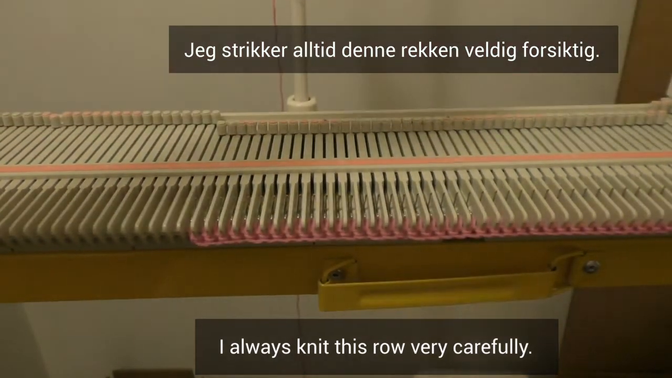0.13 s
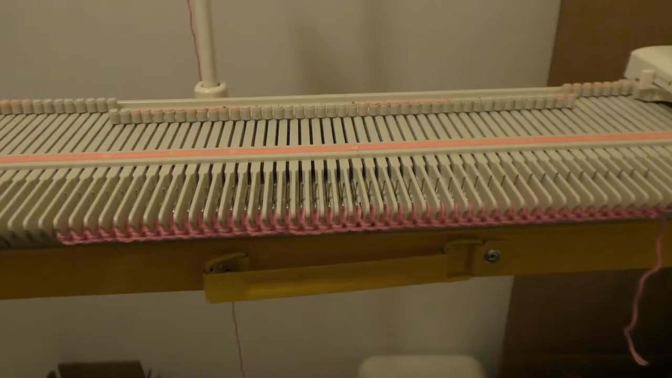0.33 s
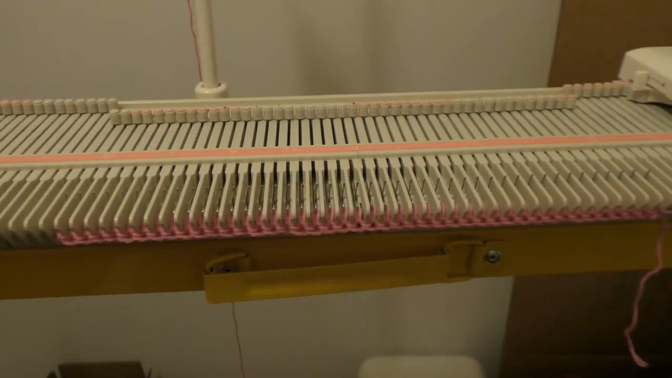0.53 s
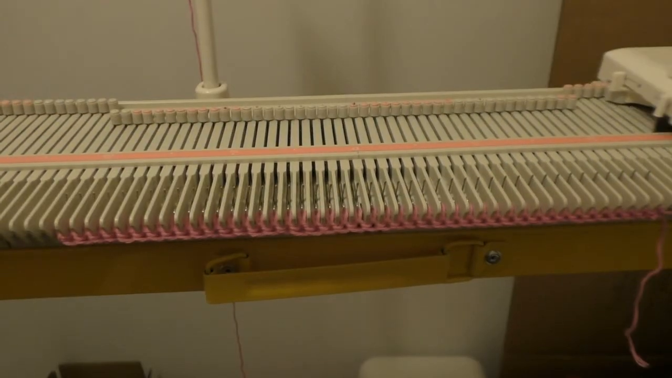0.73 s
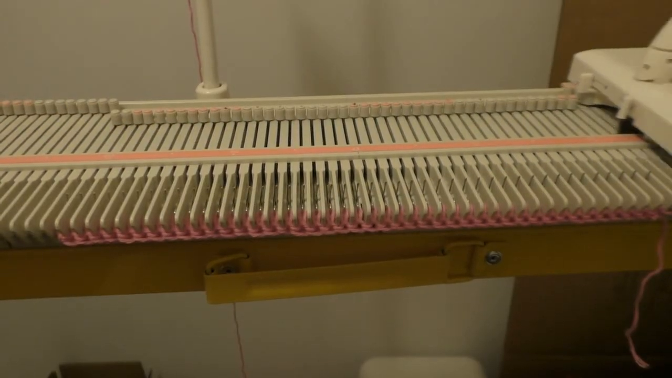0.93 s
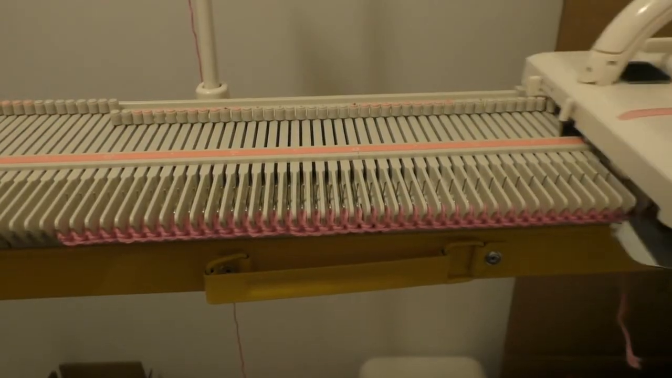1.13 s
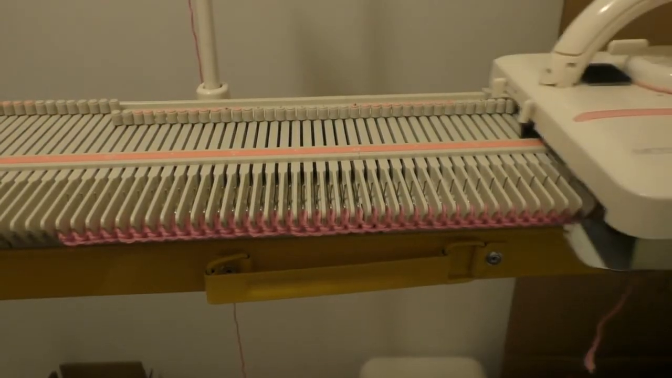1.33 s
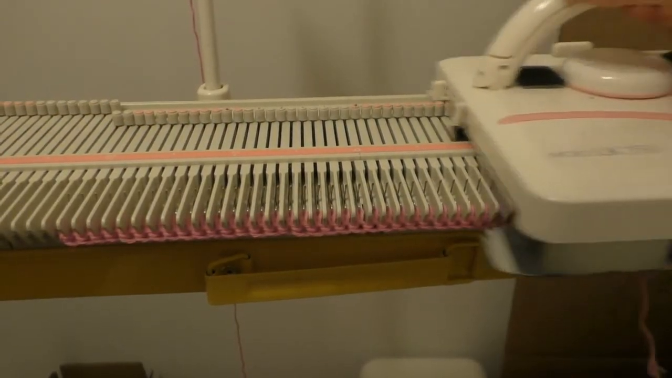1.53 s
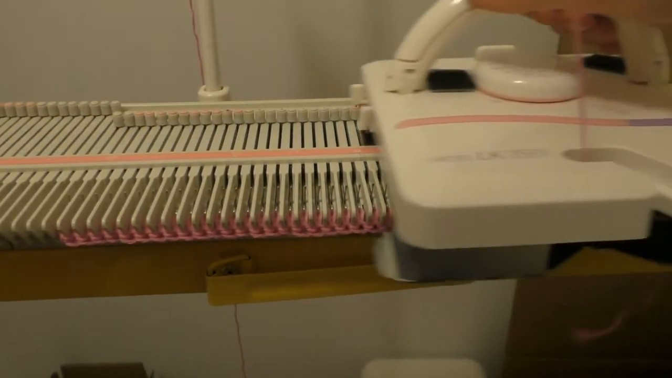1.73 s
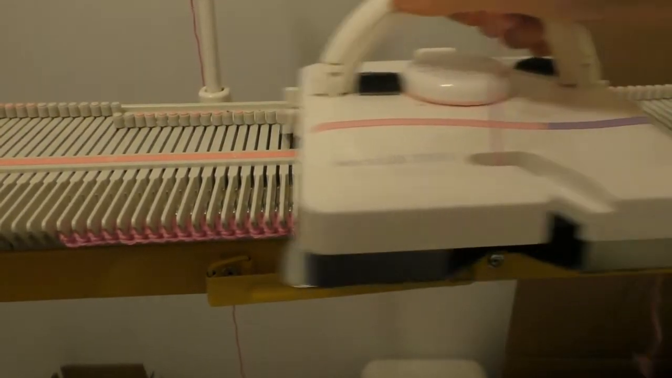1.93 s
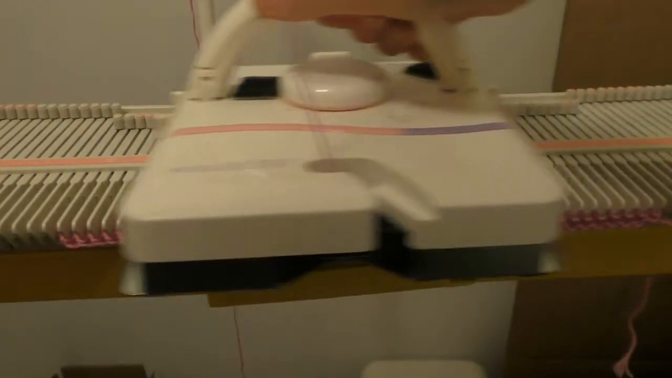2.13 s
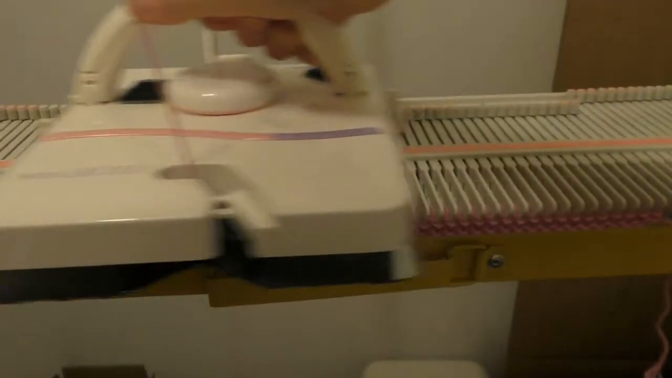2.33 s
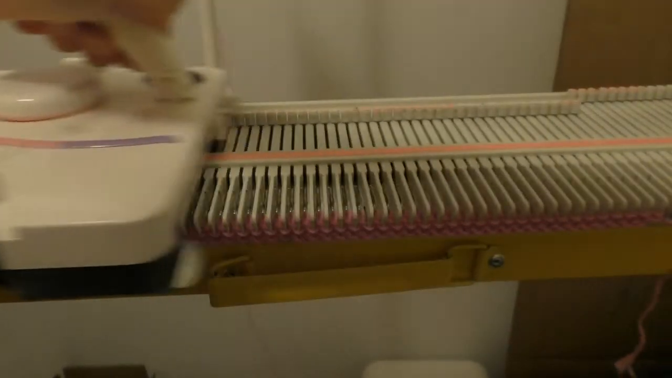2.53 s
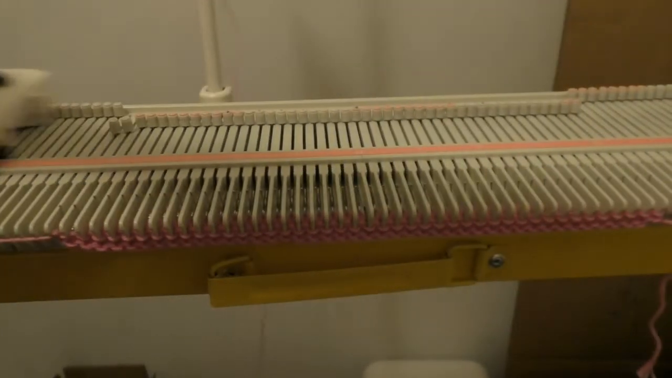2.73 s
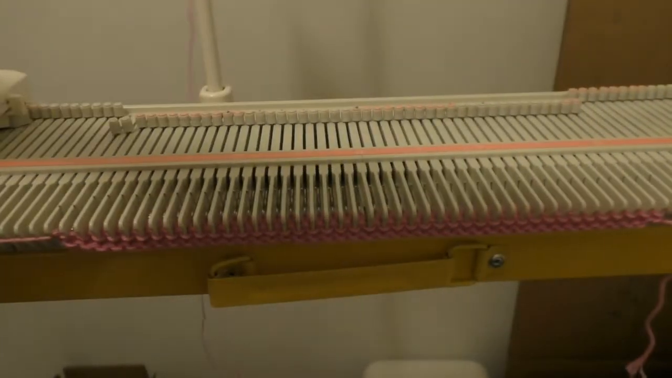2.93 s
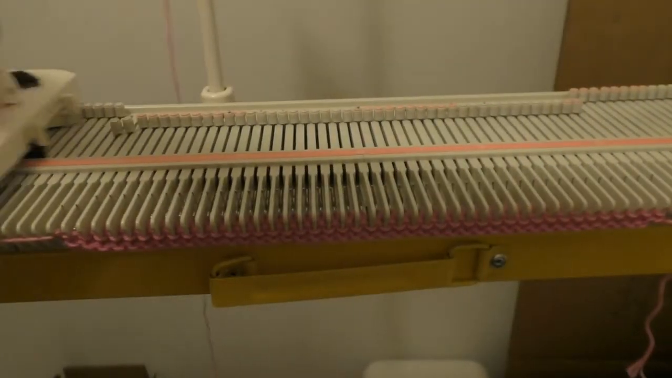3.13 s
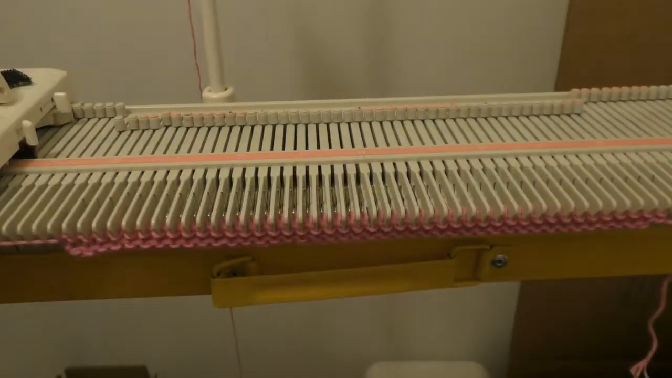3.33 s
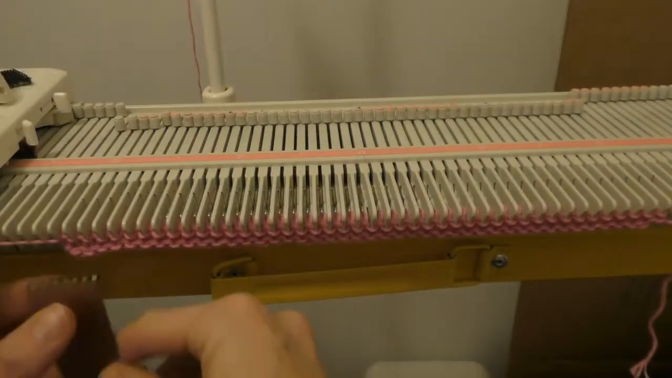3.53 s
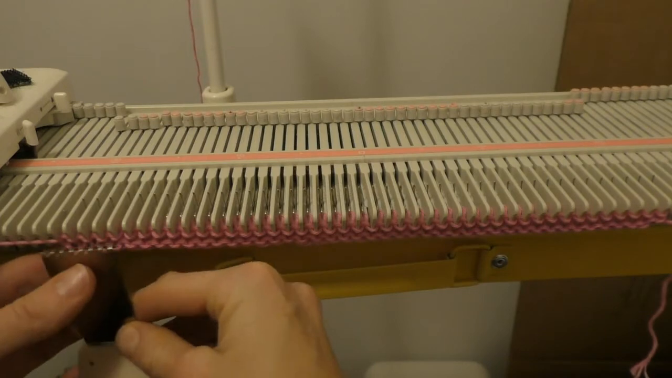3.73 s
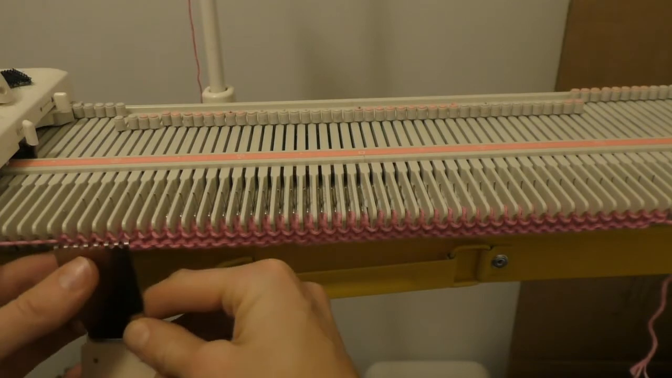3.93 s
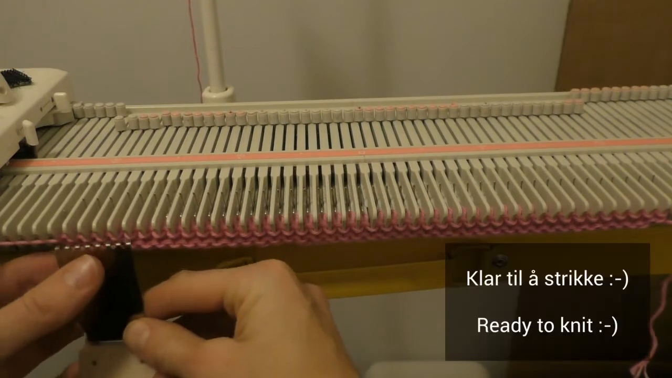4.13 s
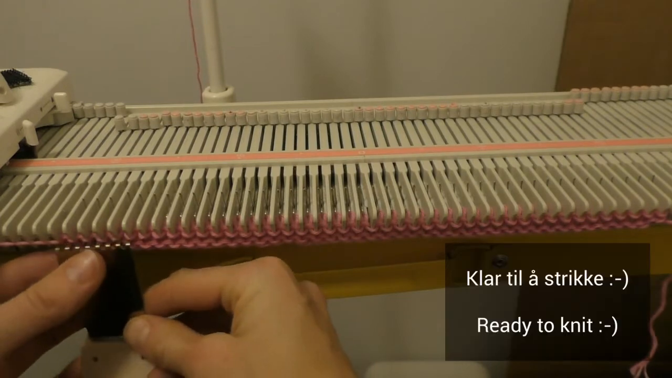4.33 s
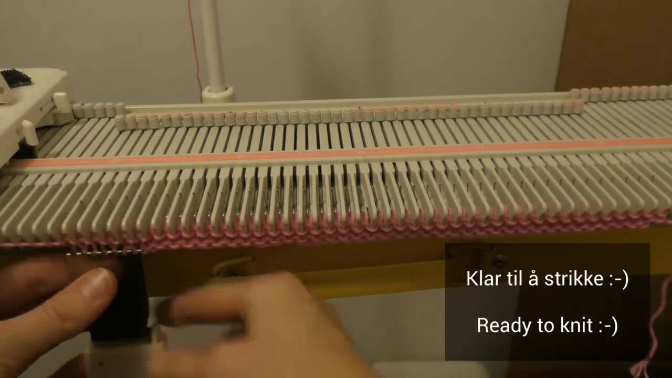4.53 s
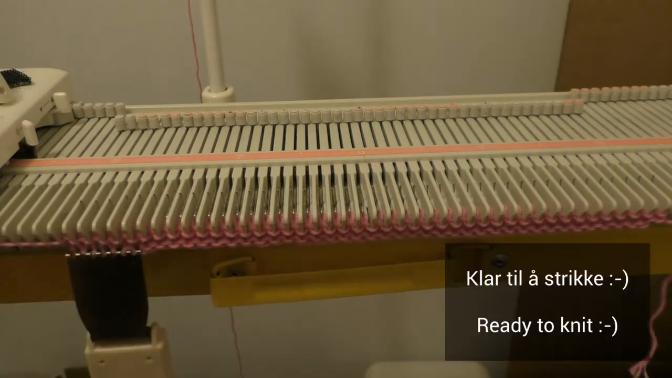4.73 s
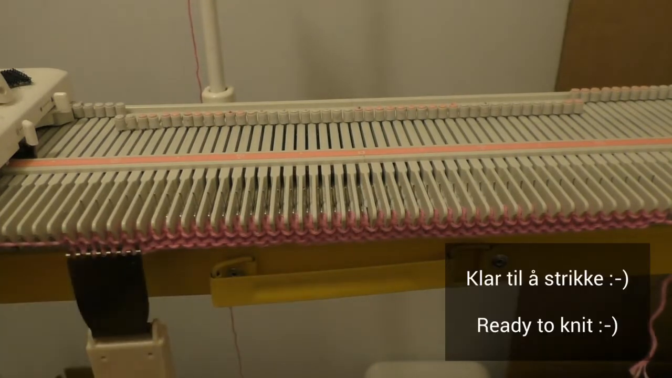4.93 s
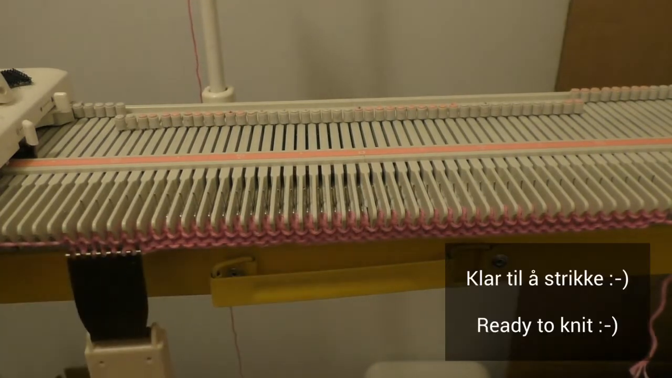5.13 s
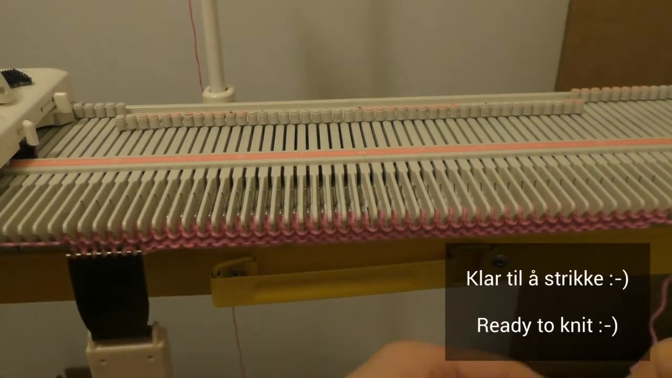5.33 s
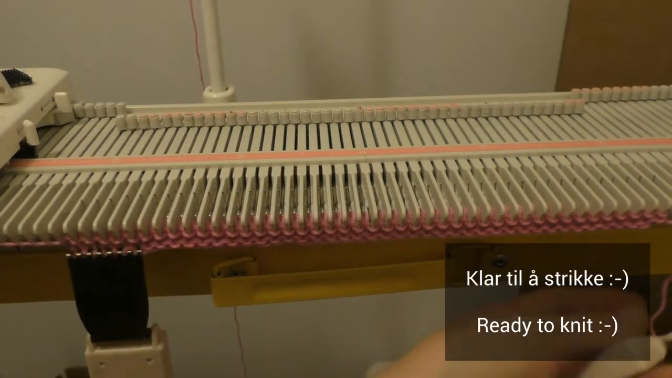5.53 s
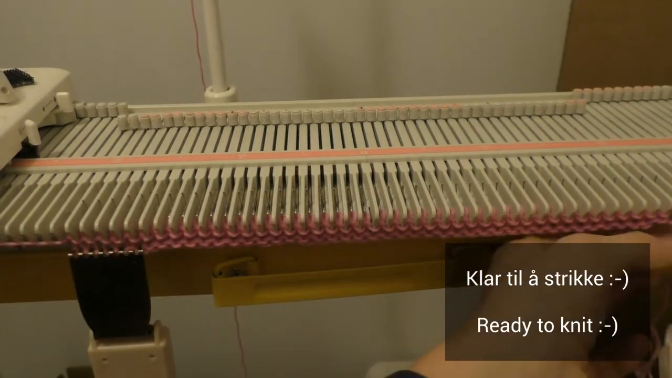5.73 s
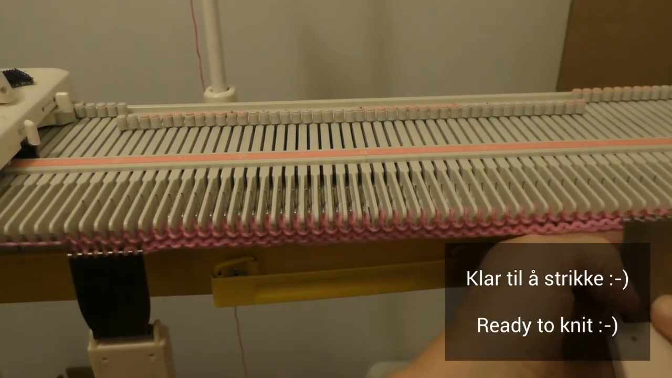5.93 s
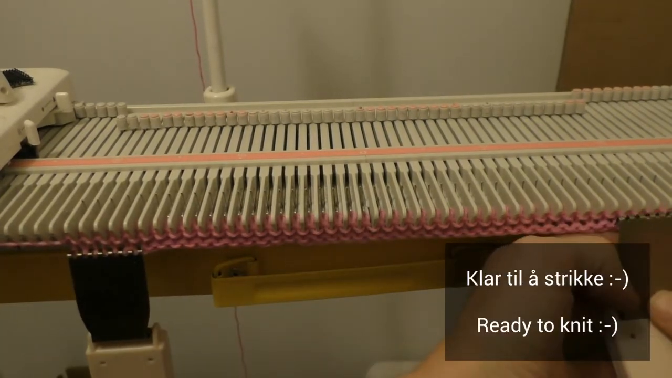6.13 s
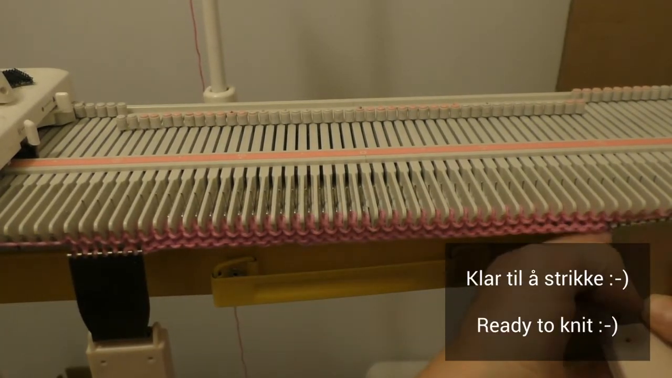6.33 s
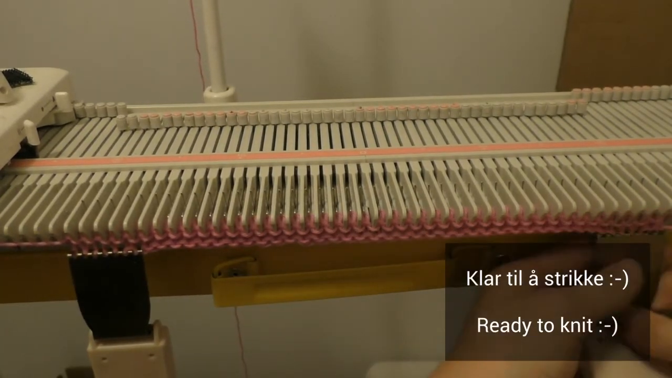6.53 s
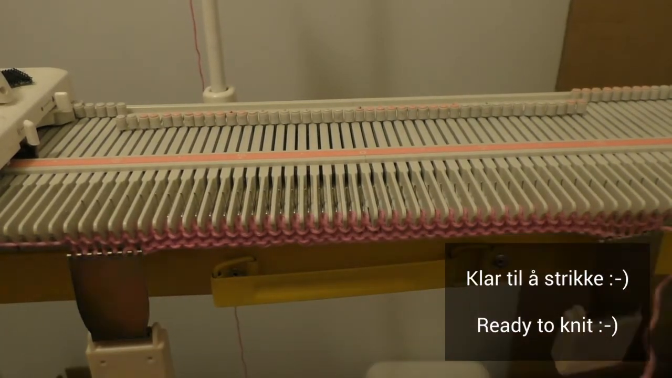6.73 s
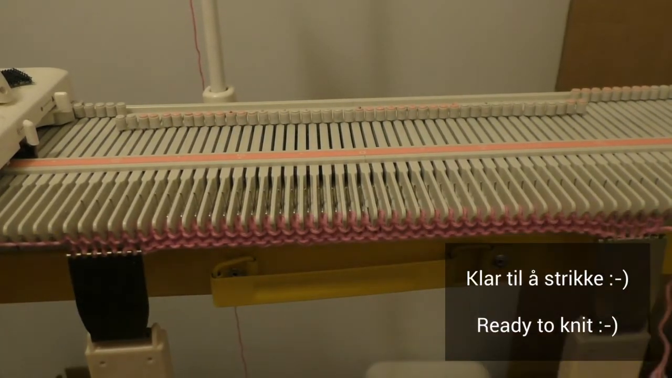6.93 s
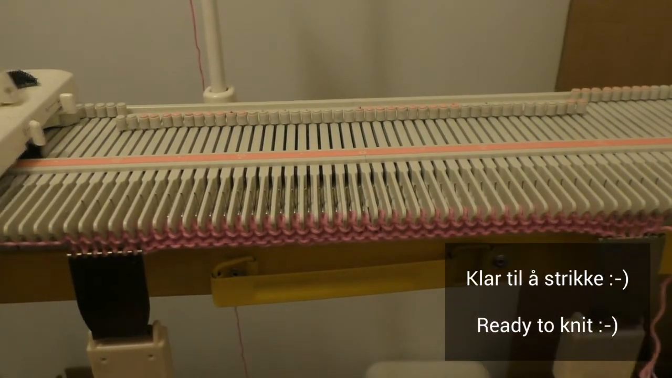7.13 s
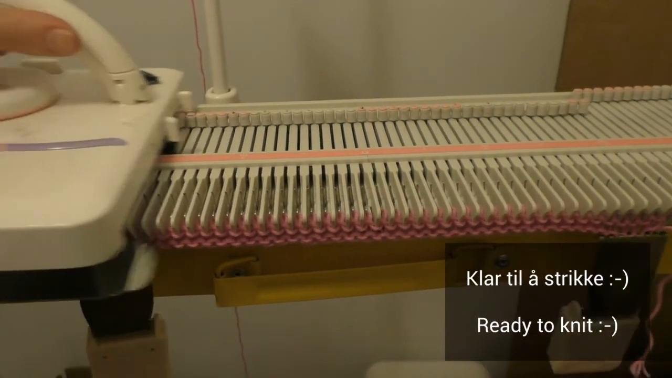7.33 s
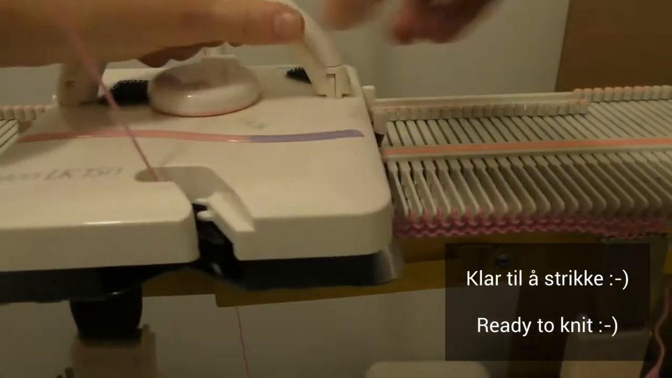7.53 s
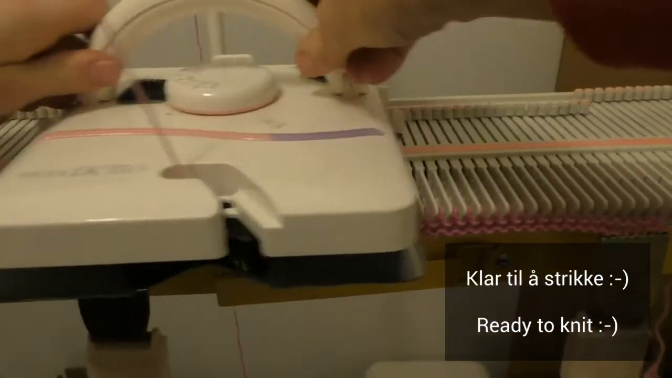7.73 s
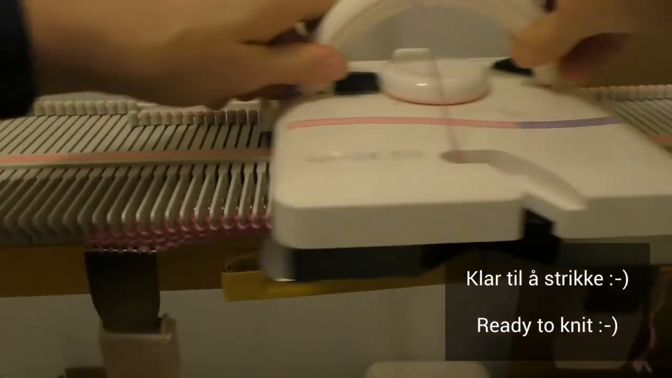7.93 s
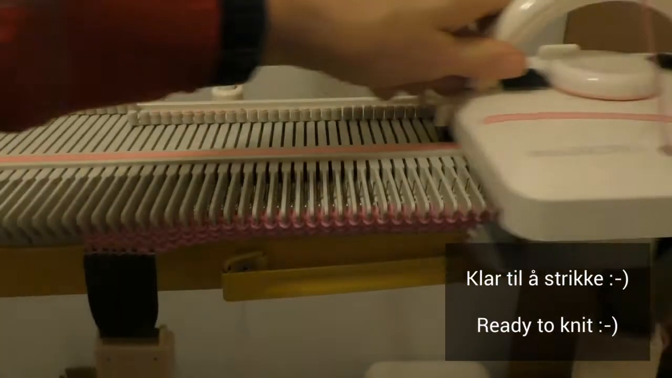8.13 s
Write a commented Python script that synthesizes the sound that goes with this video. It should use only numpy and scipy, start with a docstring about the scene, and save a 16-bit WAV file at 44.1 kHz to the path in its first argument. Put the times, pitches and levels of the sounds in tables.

```python
"""A small room with a knitting machine. The carriage is eased onto the needles, rattles left, clacks free.
A claw weight is hung on the knitting: the bed bumps, the stand creaks, metal clinks.
Two shoves take the carriage back right. The push sets needle rate, rattle and bed rumble;
each needle passed clacks on the cams, ticks its latch and twangs its shank."""
import sys
import numpy as np
from scipy import signal
from scipy.fft import rfft, irfft
from scipy.io import wavfile
from scipy.ndimage import uniform_filter1d

SR = 44100
rng = np.random.default_rng(int(sys.argv[2]) if len(sys.argv) > 2 else 0)


def dump(signal):
    """Clip the signal to [-1, 1] and save it as 16-bit WAV at the path in sys.argv[1]."""
    limited = np.clip(np.atleast_2d(signal).T, -1, 1)
    pcm = np.round(limited * 32767).astype(np.int16)
    wavfile.write(sys.argv[1], SR, pcm)


N = 364266

# hand pushes on the carriage (time [s], level [dB])
LEFT_PASS = [(0.935, -45.5), (0.968, -31), (1.152, -45), (1.16, -38), (1.374, -33), (1.504, -24.5),
             (1.618, -29.5), (1.832, -29.5), (1.836, -25.5), (2.146, -29), (2.364, -24.5), (2.42, -29),
             (2.45, -34.5), (2.52, -37.5), (2.558, -30), (2.6, -39.5)]
FIRST_SHOVE = [(7.239, -32), (7.252, -41), (7.3, -38.5), (7.322, -27), (7.432, -26.5), (7.453, -33.5),
               (7.482, -37.5), (7.512, -51), (7.539, -63.5)]
SECOND_SHOVE = [(7.66, -56.5), (7.686, -31.5), (7.752, -24.5), (7.854, -26.5), (8.001, -33), (8.03, -27.5),
                (8.07, -26.5), (8.212, -43.5), (8.26, -38.5)]
# carriage position (time [s], left over right [dB])
CARRIAGE_PAN = [(1.0, -2.5), (1.7, -1.5), (2.5, 1.3), (7.4, 0.5), (8.26, -2)]
# needle bed response (frequency [Hz], level [dB])
BED_SPECTRUM = [(290, -41), (500, -19), (613, -19.5), (760, -14), (906, -7), (1260, -3), (2010, -2),
                (2980, -3.5), (4660, -4), (6140, -6), (7210, -5), (11100, -4.5), (14000, -10.5),
                (16000, -17)]
# its narrow resonances (frequency [Hz], width [Hz], gain [dB])
BED_RINGS = [(930, 16, -5.5), (1270, 140, -13), (1760, 97, -7.5), (2200, 57, -7.5), (2955, 100, -13),
             (4058, 45, -10.5), (5550, 160, -13.5), (6010, 68, -5.5), (6360, 45, -6.5), (8490, 45, -6),
             (10560, 48, -4.5), (11500, 30, -3.5), (13770, 400, -10)]
# its antiresonances (frequency [Hz], width [Hz], cancelled share [dB])
BED_DIPS = [(1447, 71, -13), (4850, 330, -14.5), (7470, 540, -12.5), (12740, 1200, -12.5)]
# modes of cams, latches, steel shanks and resting bed (frequency [Hz], level [dB], T60 [s])
CAM_MODES = [(1261, -4.5, 0.038), (1602, -8, 0.03), (1820, -3.5, 0.035), (2214, -7, 0.037),
             (2465, -1, 0.027), (2895, -3, 0.017), (3280, -4.5, 0.015), (4034, -3.5, 0.044)]
LATCH_MODES = [(6030, -7.5, 0.04), (6270, -8.5, .04), (8440, -7, 0.035), (9170, -6.5, 0.025),
               (10570, -5.5, 0.025), (11540, -0.5, 0.033)]
SHANK_MODES = [(2987, -1, 0.045), (5680, -3.5, 0.04), (9550, -0.5, 0.04)]
BED_MODES = [(1293, -1.6, 0.18), (1805, 0, 0.061), (2274, -1, 0.043), (2573, -1.2, 0.068)]
# needles and cams snapping over (time [s], level [dB], relative treble [dB])
SNAPS = [(0.079, -35, -10.5), (0.823, -25.5, -12.5), (0.8817, -29.5, -6), (0.973, -14.5, -34),
         (1.0041, -14, -19), (1.0336, -15.5, -11.5), (1.092, -19.5, -11), (1.158, -20.5, -10),
         (1.2133, -26, -13), (1.317, -16, -10.5), (1.389, -17, -9.5), (1.4798, -12.5, -3.5),
         (1.523, -15.5, -3.5), (1.652, -11, -9.5), (1.6873, -14.5, -8.5), (1.729, -13.5, -7),
         (1.761, -15.5, -2.5), (1.805, -16.5, -5), (1.8353, -15.5, -8), (1.9754, -25, -2), (2.159, -19, -3),
         (2.5568, -14.5, -13.5), (2.6153, -23, -4.5), (3.299, -41.5, -9), (3.334, -36, -4.5),
         (4.381, -32, -21), (4.7668, -26, -10.5), (5.5907, -31.5, -2.5), (7.206, -27.5, 3.5),
         (7.3213, -18, -12), (7.375, -15, -3), (7.4391, -21, 2.5), (7.4893, -17, -9), (7.704, -10, -18),
         (7.741, -15, -13), (7.917, -17, -13), (7.99, -22, -6), (8.024, -15, -14), (8.18, -34, 6)]
# carriage shell hitting the rail (time [s], level [dB], low-pass [Hz])
KNOCKS = [(0.078, -37.5, 2900), (0.18, -47, 2030), (0.9745, -28, 7900), (1.232, -31, 1990),
          (1.273, -26.5, 2850), (1.3194, -34, 4040), (1.763, -28, 9000), (2.615, -9, 7200),
          (2.725, -23, 1300), (2.951, -31.5, 1090), (7.2116, -19, 9400), (7.228, -21, 6200),
          (7.678, -22.5, 3180), (8.1098, -26, 5000), (8.165, -30, 3340)]
# shell resonances (frequency [Hz], least width [Hz], gain [dB])
SHELL_RINGS = [(950, 60, -11.5), (1135, 93, -5), (1650, 220, 2), (1850, 170, -2.5), (2260, 130, 6),
               (2572, 130, 1.5), (2954, 260, -3.5), (4170, 600, -11.5), (6960, 1500, -8.5),
               (12900, 4000, -20.5)]
# carriage on bare rail (time [s], length [s], level [dB], fade [dB/s])
GLIDES = [(0.0, 0.8, -64, -6.5), (0.073, 0.19, -52.5, 50.5), (0.754, 0.16, -57, -39),
          (2.624, 0.18, -32, 143), (2.949, 0.24, -55.5, 0), (3.283, 0.24, -58.5, 30),
          (7.104, 0.16, -48, 60), (7.59, 0.065, -45, 118)]
# scrapes on rail and needles, and at 5.35 s the claw weight ringing on (time [s], length [s], level [dB], start
# [Hz], end [Hz], width [Hz])
RUBS = [(0.236, 0.14, -67.5, 3590, 3320, 400), (0.448, 0.056, -61, 2450, 2340, 180),
        (0.683, 0.15, -56.5, 2810, 2390, 800), (0.69, 0.15, -59.5, 1406, 1650, 597),
        (2.693, 0.09, -42.5, 1700, 1043, 606), (3.337, 0.19, -70, 5350, 4720, 1500),
        (5.35, 0.22, -65, 4350, 4140, 650), (6.861, 0.32, -73.5, 4350, 3780, 2000),
        (7.599, 0.024, -50.5, 5230, 4930, 1190)]
# claw weight scraping metal (time [s], length [s], level [dB])
CLAW_SCRAPES = [(5.332, 0.0036, -35), (5.337, 0.012, -32.5), (5.35, 0.012, -37), (5.362, 0.0147, -39.5)]
# weight resonances (frequency [Hz], width [Hz], gain [dB])
CLAW_RINGS = [(2380, 40, 1), (2435, 30, 9), (3060, 42, 12), (3110, 45, 4), (3220, 87, 9), (4040, 70, 5),
              (4370, 160, 2.5), (6090, 32, 11), (8400, 2400, -7), (9770, 49, 4), (10400, 970, -8),
              (14500, 1800, -8)]
# touches on the needles (time [s], length [s], midrange [dB], treble [dB])
BRUSHES = [(0.517, 0.025, -54, -56), (3.156, 0.014, -51.5, -50), (3.332, 0.11, -70, -61),
           (4.367, 0.048, -58, -64), (4.428, 0.036, -60, -74), (4.766, 0.019, -49.5, -52.5),
           (4.788, 0.24, -64, -71.5), (5.276, 0.22, -63, -62), (5.532, 0.049, -57.5, -59),
           (5.593, 0.037, -58, -46.5), (6.464, 0.038, -52.5, -59), (6.5, 0.028, -60, -68)]
# flicked bed parts (time [s], level [dB], frequency [Hz], T60 [s])
PINGS = [(2.949, -37, 946, 0.057), (3.334, -36.5, 4870, 0.022), (5.547, -52.5, 6100, 0.15),
         (5.596, -48, 4350, 0.14), (6.571, -66, 4393, 0.24)]
# taps on the bed (time [s], level [dB])
TAPS = [(0.08, -44.5), (0.409, -58), (4.3815, -53), (4.436, -58), (6.374, -56)]
# hands bumping the bed (time [s], level [dB], start pitch [Hz])
BUMPS = [(0.885, -49.5, 152), (3.3, -48, 138), (3.379, -44.5, 135), (3.592, -49, 220), (3.674, -44, 121),
         (4.281, -47, 170), (4.775, -43.5, 180), (4.952, -46, 148), (5.015, -49.5, 124), (5.282, -50, 345),
         (5.387, -50, 143), (5.468, -49, 125), (5.726, -52, 150), (6.259, -47, 225), (6.277, -40, 145),
         (6.298, -44.5, 70), (6.477, -42, 236), (6.485, -43.5, 90), (7.271, -46, 130), (7.32, -37, 172),
         (7.488, -41, 119)]
# bed rumble (frequency [Hz], level [dB])
RUMBLE_SPECTRUM = [(24, -61), (40, -21.5), (54, -19), (81, -9), (146, 3), (204, -4.5), (310, -0.5),
                   (413, -3.5), (599, -14.5), (700, -9.5), (910, -49.5), (1540, -120)]
# slips of the stand (time [s], length [s], level [dB], relative edge [dB])
CREAKS = [(0.479, 0.021, -49.5, -15), (4.71, 0.027, -54.5, -4), (4.759, 0.026, -44.5, -20),
          (4.779, 0.04, -39.5, -8), (4.817, 0.019, -41.5, -9), (4.862, 0.046, -44.5, -13),
          (5.191, 0.051, -45, -2), (5.227, 0.02, -48.5, 3.5), (5.245, 0.025, -40, -8.5),
          (5.264, 0.02, -39, -3.5), (5.282, 0.017, -41.5, -1), (7.264, 0.0473, -42.5, -16),
          (7.318, 0.068, -45, -13)]
# resonances of stand and slip edge (frequency [Hz], width [Hz], gain [dB])
STAND_RINGS = [(172, 58, 0), (348, 140, 9.5), (465, 49, 0)]
EDGE_RINGS = [(1000, 390, 5), (1210, 470, -0.5), (1830, 6100, -14)]
# room noise (frequency [Hz], level [dB])
AIR_SPECTRUM = [(20, -10.5), (134, -6.5), (168, -8), (301, -9.5), (367, -13), (472, -14), (607, -27),
                (1120, -17.5), (1600, -23), (2750, -27), (4300, -32), (6360, -38), (10000, -35.5),
                (16000, -35)]

FULL_DRIVE_DB, COAST_DB_PER_S = -27, 169.5
NEEDLES_PER_S, CLATTER_DB, SIZZLE_DB, RUMBLE_DB = 47, -32, -31.5, -49.5   # at drive 1
CAM_DB, LATCH_DB, SHANK_DB, CAM_SCATTER_S = -31.5, -32, -31, 0.0054
CATCH_SHARE, CATCH_DB, CATCH_TREBLE_DB, SNAP_RING_DB = 0.04, -18.5, -15.5, -16.5
KNOCK_HOLD_S, KNOCK_T60_S = 0.002, 0.032
GLIDE_TREBLE_DB, GLIDE_LOAD_DB = -7.5, -6
RUB_RELEASE_S, AFTER_RING_DB, AFTER_RING_T60_S = 0.011, -6, 0.53
BUMP_HOLD_S, BUMP_T60_S, BUMP_SAG_OCT_PER_S = 0.014, 0.11, 8
SHUDDER_DB, SHUDDER_T60_S = -18.5, 1.1
ROOM_DB, ROOM_T60_S, ROOM_TREBLE_T60_S, AIR_DB = -11, 0.32, 0.28, -60
WIDTH_DB, NARROW_HZ, NARROW_SHARE = 1.3, (5700, 9400), 0.67
LIMIT_DB, RELEASE_DB_PER_S, CUTOFF_HZ = -9, 4, 15750
SPLIT_HZ, MAX_HITS = 5000, 400


def hand_drive():
    """Push on the carriage: 0 at rest, about 1 at full speed; coasts after each push."""
    t = np.arange(N) / SR
    drive = 0
    for push in (LEFT_PASS, FIRST_SHOVE, SECOND_SHOVE):
        start_s, end_s = push[0][0], push[-1][0]
        coast_db = COAST_DB_PER_S * np.maximum(t - end_s, 0)
        drive = drive + from_db(curve(push) - FULL_DRIVE_DB - coast_db) * (t >= start_s)
    return drive


def needle_times(drive):
    """Times [s] at which needles are reached; a harder push is faster."""
    passed = np.cumsum(NEEDLES_PER_S * drive ** 0.7) / SR
    return np.flatnonzero(np.diff(np.floor(passed))) / SR


def needle_beat(times_s):
    """Force pulses of needle butts on the cams, uneven in time and strength."""
    jitter, strength = rng.standard_normal((MAX_HITS, 2))[:len(times_s)].T
    hits_s = np.clip(times_s + .0012 * jitter, 0, (N - 1) / SR)
    hits_db = 1.5 * np.clip(strength, -2, 2)
    hits = contacts([(s, db, .035) for s, db in zip(hits_s, hits_db)])
    return unit_rms(np.hypot(1, hits))


def rattle(drive):
    """Many needles sliding through the cams: gritty, pulsing (clatter, sizzle) forces."""
    beat = needle_beat(needle_times(drive))
    clatter = from_db(CLATTER_DB) * drive ** 0.91 * grit(spread_db=-1.8, grain_s=.00061)
    sizzle = from_db(SIZZLE_DB) * drive ** 1.17 * grit(spread_db=2.5, grain_s=.0019)
    return beat * np.array([clatter, sizzle])


def needle_bed(clatter, sizzle):
    """Forces to sound: the bed answers clatter in the midrange, the latches sizzle in the treble."""
    def radiate(force, band):
        rung = force + resonate(force, BED_RINGS) - resonate(force, BED_DIPS)
        return cut(cut(coloured(rung, BED_SPECTRUM), 850, "high"), SPLIT_HZ, band)
    out, impulse = 0, signal.unit_impulse(SR // 4)[None]
    for force, side_db, band in ((clatter, -10, "low"), (sizzle, -9.5, "high")):
        out = out + radiate(force * stereo_noise(side_db), band) / np.linalg.norm(radiate(impulse, band))
    return out


def needle_strikes(drive):
    """Each butt clacks on the cams, its latch flicks shut, its shank twangs."""
    times_s = needle_times(drive)
    gains = drive[(times_s * SR).astype(int)] ** 0.83
    scatter_s = CAM_SCATTER_S * rng.standard_normal(MAX_HITS)[:len(times_s)]
    clacks_s = np.clip(times_s + scatter_s, 0, N / SR)
    cams = from_db(CAM_DB) * struck(clacks_s, gains, CAM_MODES, detune=.02, spread_db=4)
    latches = from_db(LATCH_DB) * struck(times_s, gains, LATCH_MODES, detune=.008, spread_db=4.5)
    # wide detune: shank pitch depends on how far the needle sticks out
    shanks = from_db(SHANK_DB) * struck(clacks_s, gains, SHANK_MODES, detune=.08, spread_db=.5)
    return cams + latches + shanks


def snaps(drive):
    """Caught needles let go, at listed times and at random: (clatter, sizzle) forces."""
    caught = [(s, CATCH_DB + 20 * np.log10(drive[round(s * SR)] + 1e-9), CATCH_TREBLE_DB)
              for s, chance in zip(needle_times(drive), rng.random(MAX_HITS)) if chance < CATCH_SHARE]
    ticks = list(SNAPS) + caught
    clatter = contacts([(s, db - 20.5, .03) for s, db, _ in ticks])
    sizzle = contacts([(s, db + treble_db + .5, .025) for s, db, treble_db in ticks])
    return lag(np.array([clatter, sizzle]), tau_s=.0006)


def snap_rings():
    """The listed snaps ring the cams."""
    times_s, db, _ = np.transpose(SNAPS)
    return struck(times_s, from_db(db + SNAP_RING_DB), CAM_MODES, detune=.02, spread_db=3)


def shell_knocks():
    """The plastic shell hits the rail and chatters briefly; soft contacts are duller."""
    force, size = np.zeros((2, N + SR)), SR // 4
    decay = from_db(-60 * np.maximum(np.arange(size) / SR - KNOCK_HOLD_S, 0) / KNOCK_T60_S)
    for s, db, top_hz in KNOCKS:
        at = round(s * SR)
        burst = from_db(db) * decay * stereo_noise(side_db=-10.5, size=size)
        force[:, at:at + size] += cut(burst, top_hz, "low", order=2)
    damped = [(hz, max(width_hz, hz / 16), db) for hz, width_hz, db in SHELL_RINGS]
    return cut(body(force[:, :N], damped), 920, "high", order=6)


def rail_glides():
    """Off the needles the carriage rubs only the rail: duller (clatter, sizzle) forces."""
    force = np.zeros(N)
    for s, length_s, db, fade_db_per_s in GLIDES:
        at, t = round(s * SR), np.arange(round(length_s * SR)) / SR
        force[at:at + len(t)] = np.hypot(force[at:at + len(t)], from_db(db - fade_db_per_s * t))
    friction = settle(uniform_filter1d(force, size=400)) * grit(spread_db=.5, grain_s=.016)
    return friction * from_db([[0], [GLIDE_TREBLE_DB]])


def rubs():
    """Friction through a resonance that slides with the contact; swells and fades."""
    out = np.zeros((2, N + SR))
    for s, length_s, db, start_hz, end_hz, width_hz in RUBS:
        at, size = round(s * SR), round(length_s * SR)
        phase = 2 * np.pi * np.cumsum(np.geomspace(start_hz, end_hz, size)) / SR
        ring = 0
        for carrier in (np.sin(phase), np.cos(phase)):
            flutter = cut(stereo_noise(side_db=-8, size=SR // 2), width_hz / 2, "low", order=2)
            ring = ring + flutter[:, -size:] * carrier
        swell = np.sin(np.linspace(0, np.pi, size))
        out[:, at:at + size] += from_db(db) * unit_rms(ring * swell)
    return out[:, :N] * grit(spread_db=1, grain_s=.005)


def claw_weight():
    """The weight's metal plate scrapes and rings."""
    force = strokes(CLAW_SCRAPES) * grit(spread_db=3, grain_s=.001) * stereo_noise(side_db=-11)
    return cut(body(force, CLAW_RINGS), 1900, "high") * from_db([[-.8], [.8]])


def brushes():
    """Yarn, fingers and claw teeth brush the needles: (clatter, sizzle) forces."""
    clatter = strokes([(s, length_s, mid_db) for s, length_s, mid_db, _ in BRUSHES])
    sizzle = strokes([(s, length_s, treble_db) for s, length_s, _, treble_db in BRUSHES])
    touch = uniform_filter1d(np.array([clatter, sizzle]), size=400)
    return settle(touch) * grit(spread_db=3, grain_s=.0019) * grit(spread_db=1, grain_s=.0094)


def pings():
    """Flicked metal parts, one decaying tone each."""
    t = np.arange(N) / SR
    return sum(contacts([(s, db, t60_s)]) * np.sin(2 * np.pi * hz * (t - s))
               for s, db, hz, t60_s in PINGS)


def taps():
    """Light taps ring the resting bed."""
    times_s, db = np.transpose(TAPS)
    return struck(times_s, from_db(db), BED_MODES, detune=.008, spread_db=2)


def bed_rumble(load):
    """The heavy bed rumbles under load and shudders after each bump or creak."""
    jolts = [(s, db) for s, db, _ in BUMPS] + [(s, db) for s, _, db, _ in CREAKS]
    shudder = contacts([(s, db + SHUDDER_DB, SHUDDER_T60_S) for s, db in jolts])
    shake = np.hypot(from_db(RUMBLE_DB) * load ** 0.46, shudder)
    return shake * coloured(stereo_noise(side_db=-19), RUMBLE_SPECTRUM) * grit(spread_db=1.2, grain_s=.02)


def bed_bumps():
    """Hands bump the bed: thuds sink in pitch, damped by the knitting."""
    thuds, t = np.zeros(N), np.arange(SR // 4) / SR
    attack = 1 - np.exp(-t / .00067)
    decay = from_db(-60 * np.maximum(t - BUMP_HOLD_S, 0) / BUMP_T60_S)
    for s, db, hz in BUMPS:
        at = round(s * SR)
        phase = 2 * np.pi * np.cumsum(hz * 2 ** (-BUMP_SAG_OCT_PER_S * t)) / SR
        thuds[at:at + len(t)] += from_db(db) * attack * decay * np.sin(phase)
    return cut(thuds * grit(spread_db=4, grain_s=.003), 450, "low")


def stand_creaks():
    """Stick-slip of the loaded stand: a low groan with a rasping edge."""
    force = strokes([(s, length_s, db) for s, length_s, db, _ in CREAKS])
    edge = strokes([(s, length_s, db + edge_db) for s, length_s, db, edge_db in CREAKS])
    edge = np.maximum(edge, from_db(-12) * settle(edge))
    slips = grit(spread_db=2.5, grain_s=.003) * stereo_noise(side_db=-12)
    groan = cut(body(force * slips, STAND_RINGS), 500, "low")
    rasp = cut(body(edge * slips, EDGE_RINGS), 700, "high")
    return (groan + cut(rasp, 4000, "low", order=2)) * from_db([[-.7], [.7]])


def room_echo(x):
    """Diffuse tail; treble dies sooner."""
    t = np.arange(SR // 2) / SR
    echoes = stereo_noise(side_db=-3, size=len(t)) * (t > .004)
    dull = cut(echoes, 8500, "low", order=2) * from_db(-60 * t / ROOM_T60_S)
    bright = cut(echoes, 12000, "high", order=2) * from_db(1 - 60 * t / ROOM_TREBLE_T60_S)
    tail = dull + bright
    return from_db(ROOM_DB) * signal.fftconvolve(x, tail / np.linalg.norm(tail[0]), axes=1)[:, :N]


def room_air():
    """Faint, steady, mostly low noise."""
    return from_db(AIR_DB) * coloured(stereo_noise(side_db=-1.5), AIR_SPECTRUM)


def struck(times_s, gains, modes, detune, spread_db):
    """Blows ring the modes, each with random pitch, strength, sign and pan."""
    hz, db, t60_s = np.transpose(modes)[:, :, None]
    t, out = np.arange(int(t60_s.max() * SR)) / SR, np.zeros((2, N + SR))
    decay = from_db(db - 60 * t / t60_s)
    draws = np.clip(rng.standard_normal((MAX_HITS, 4, len(modes), 1)), -2, 2)
    for s, gain, (pitch, strength, sign, side) in zip(times_s, gains, draws):
        at = round(s * SR)
        tones = np.sign(sign) * np.sin(2 * np.pi * hz * (1 + detune * pitch) * t)
        rings = from_db(spread_db * strength) * decay * tones
        pan = from_db(2 * np.array([side[:, 0], -side[:, 0]]))
        out[:, at:at + len(t)] += gain * pan @ rings
    return cut(out[:, :N], 900, "high")


def contacts(rows):
    """Force envelope of impacts (time [s], level [dB], T60 [s])."""
    power = np.zeros(N)
    for s, db, t60_s in rows:
        at, t = round(s * SR), np.arange(int(2 * t60_s * SR)) / SR
        burst = from_db(db - 60 * t / t60_s)[:N - at]
        power[at:at + len(burst)] += burst ** 2
    return np.sqrt(power)


def strokes(rows):
    """Force envelope of held, soft-ended rubs (time [s], length [s], level [dB])."""
    force = np.zeros(N)
    for s, length_s, db in rows:
        force[round(s * SR):round((s + length_s) * SR)] = from_db(db)
    return uniform_filter1d(force, size=100)


def settle(force):
    """Release of a rub: fast fall, then faint ringing."""
    after_ring = from_db(AFTER_RING_DB) * lag(force, AFTER_RING_T60_S / np.log(1000))
    return np.maximum(force, np.maximum(lag(force, RUB_RELEASE_S), after_ring))


def grit(spread_db, grain_s):
    """Unit-power roughness: one random strength per grain."""
    grain = np.arange(N) / SR / grain_s
    strengths = np.clip(rng.standard_normal(N + 1), -2.5, 2.5)
    return unit_rms(from_db(spread_db * np.interp(grain, np.arange(N + 1), strengths)))


def stereo_noise(side_db, size=N):
    """White noise: unit-power mid, weaker side."""
    mid, side = rng.standard_normal((2, size))
    return mid + from_db(side_db) * side * [[1], [-1]]


def coloured(x, spectrum):
    """Minimum-phase filter; white noise keeps its power."""
    size = 8192
    hz, db = np.transpose(spectrum)
    bins_hz = np.maximum(np.arange(size // 2 + 1) * SR / size, 1)
    gains = from_db(np.interp(np.log(bins_hz), np.log(hz), db))
    cepstrum = irfft(np.log(gains))
    cepstrum[1:size // 2] *= 2
    cepstrum[size // 2 + 1:] = 0
    response = irfft(np.exp(rfft(cepstrum)))[:size // 2]
    return signal.fftconvolve(x, response[None] / np.linalg.norm(response), axes=1)[:, :N]


def resonate(x, rings):
    """Parallel resonators."""
    out = 0
    for hz, width_hz, db in rings:
        r = np.exp(-np.pi * width_hz / SR)
        poles = [1, -2 * r * np.cos(2 * np.pi * hz / SR), r * r]
        out = out + from_db(db) * (1 - r * r) / 2 * signal.lfilter([1, 0, -1], poles, x + 1e-18)
    return out


def body(x, rings):
    """Resonators scaled so white noise keeps its power."""
    return resonate(x, rings) / np.linalg.norm(resonate(signal.unit_impulse(SR // 4), rings))


def cut(x, hz, kind, order=4):
    """Butterworth filter."""
    return signal.sosfilt(signal.butter(order, hz, kind, fs=SR, output="sos"), x + 1e-18)


def lag(x, tau_s):
    """One-pole smoothing."""
    keep = np.exp(-1 / (tau_s * SR))
    return signal.lfilter([1 - keep], [1, -keep], x + 1e-18)


def curve(rows):
    """Breakpoints to samples."""
    return np.interp(np.arange(N) / SR, *np.transpose(rows))


def unit_rms(x):
    """Scale to unit power."""
    return x / np.sqrt(np.mean(x ** 2) + 1e-20)


def from_db(db):
    """Decibels to gain."""
    return 10 ** (np.asarray(db) / 20)


def scene():
    """One drive sets rate, rattle and rumble; the carriage pans, stand and weight stay put."""
    drive, gliding = hand_drive(), rail_glides()
    # unrelated forces add in power
    clatter, sizzle = np.sqrt(rattle(drive) ** 2 + gliding ** 2 + snaps(drive) ** 2 + brushes() ** 2)
    needles = needle_bed(clatter, sizzle) + needle_strikes(drive) + snap_rings()
    pan = from_db(curve(CARRIAGE_PAN) * [[.5], [-.5]])
    carriage = (needles + shell_knocks() + taps() + rubs()) * pan
    clinks = claw_weight() + pings()
    echoes = room_echo(carriage + from_db(-10) * clinks)
    load = drive + from_db(GLIDE_LOAD_DB - CLATTER_DB) * np.abs(gliding[0])
    return carriage + clinks + bed_rumble(load) + bed_bumps() + stand_creaks() + echoes + room_air()


def record(dry):
    """Stereo widened, but narrowed in one treble band; slow-release limiter; steep low-pass."""
    mid, side = (dry[0] + dry[1]) / 2, (dry[0] - dry[1]) / 2
    side = from_db(WIDTH_DB) * (side - NARROW_SHARE * cut(side, NARROW_HZ, "band", order=1))
    stereo = np.array([mid + side, mid - side])
    peak_db = 20 * np.log10(np.abs(stereo).max(axis=0) + 1e-9)
    excess_db = np.maximum(peak_db - LIMIT_DB, 0)
    recovery_db = RELEASE_DB_PER_S * np.arange(N) / SR
    duck_db = uniform_filter1d(np.maximum.accumulate(excess_db + recovery_db) - recovery_db, size=128)
    low_pass = signal.ellip(12, .1, 80, CUTOFF_HZ, fs=SR, output="sos")
    return signal.sosfilt(low_pass, stereo * from_db(-duck_db))


dry = scene()
out = record(dry)
dump(out)
```